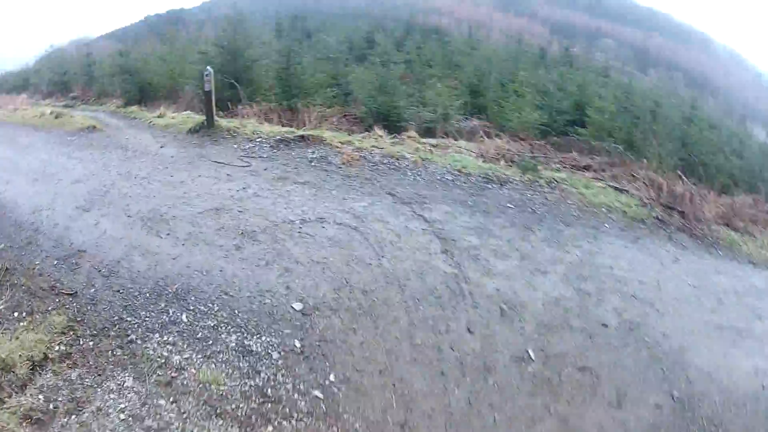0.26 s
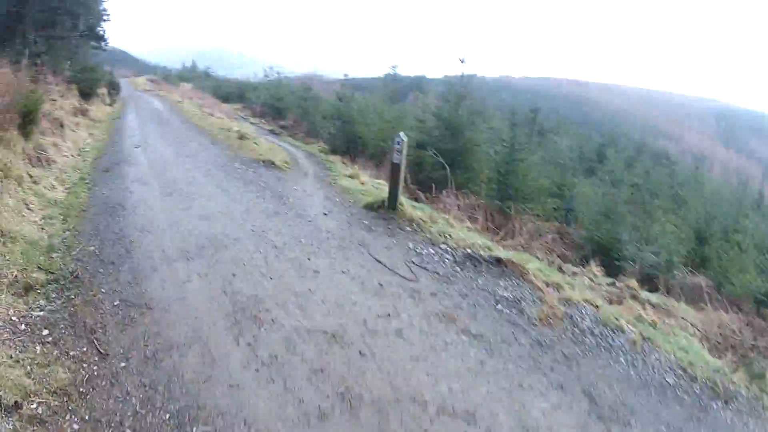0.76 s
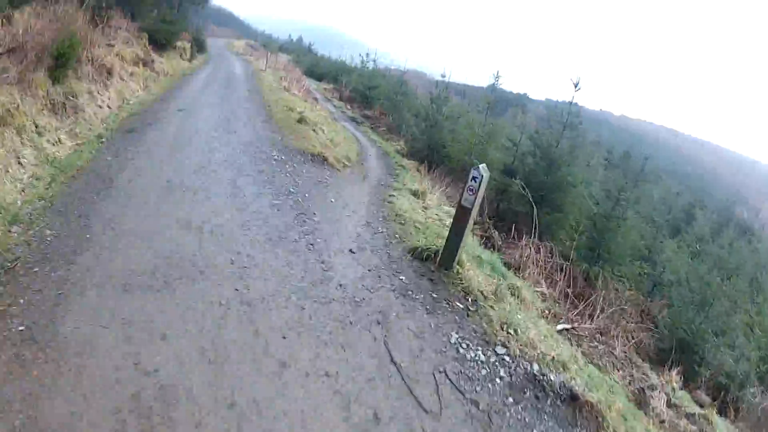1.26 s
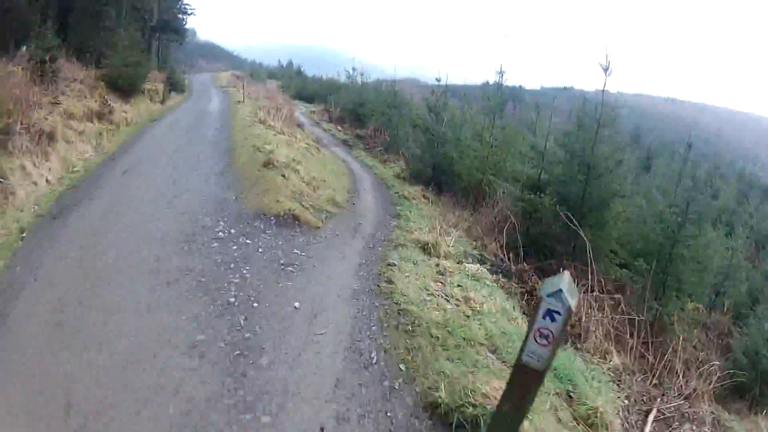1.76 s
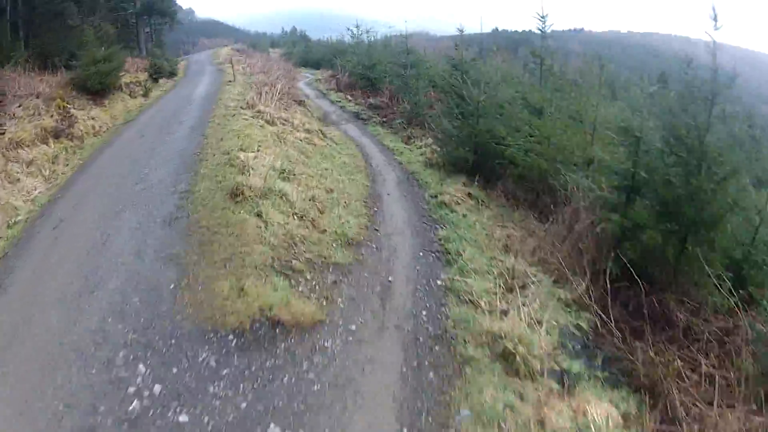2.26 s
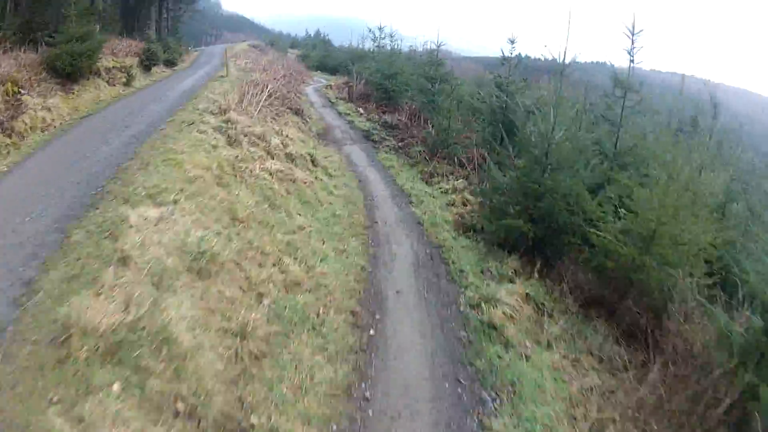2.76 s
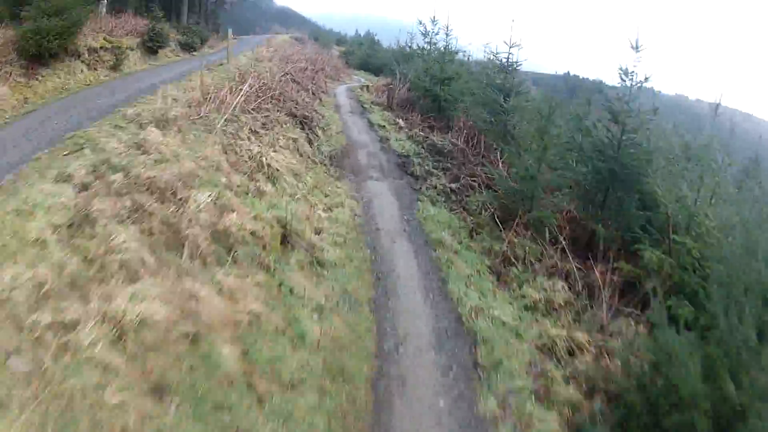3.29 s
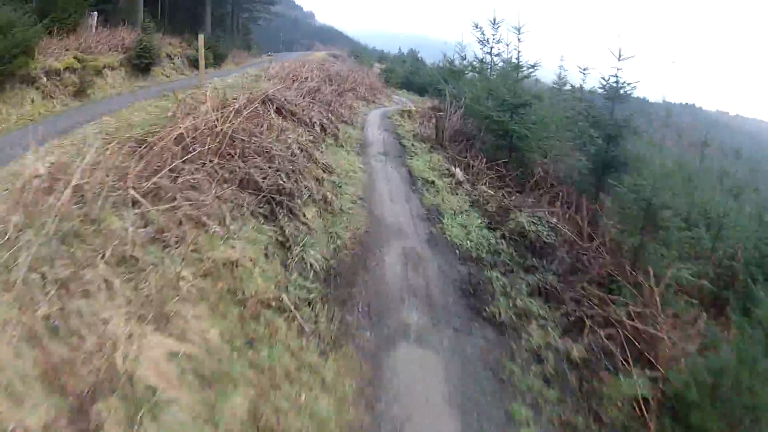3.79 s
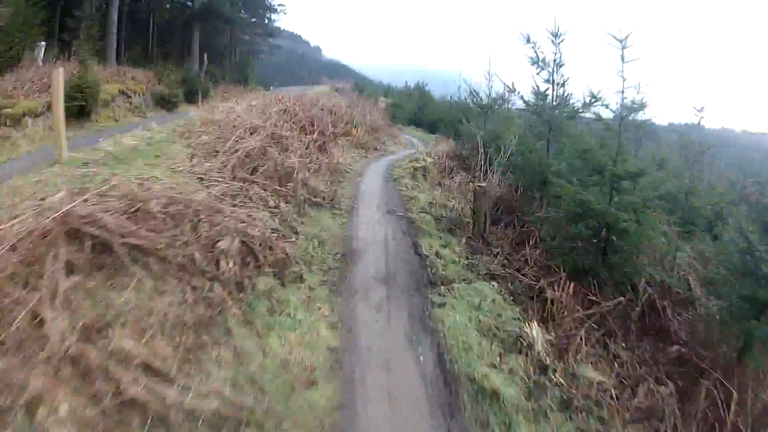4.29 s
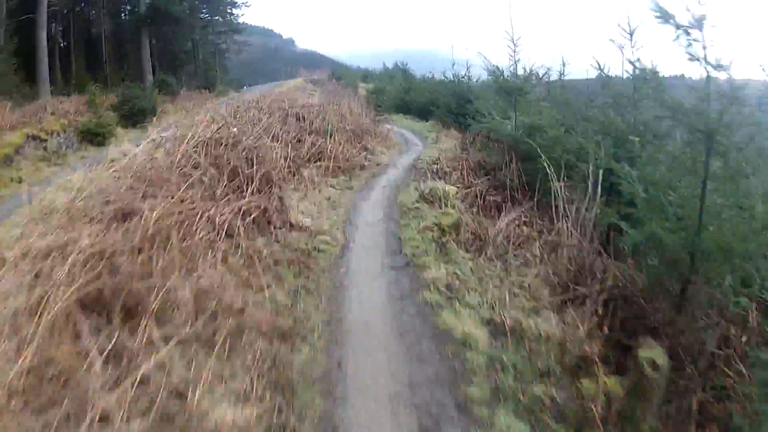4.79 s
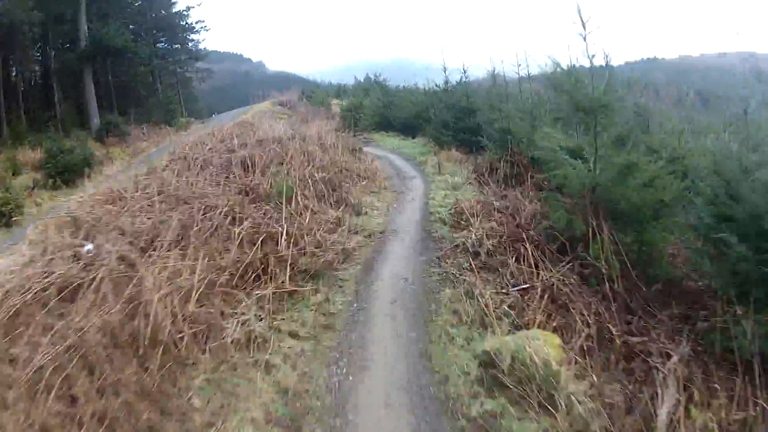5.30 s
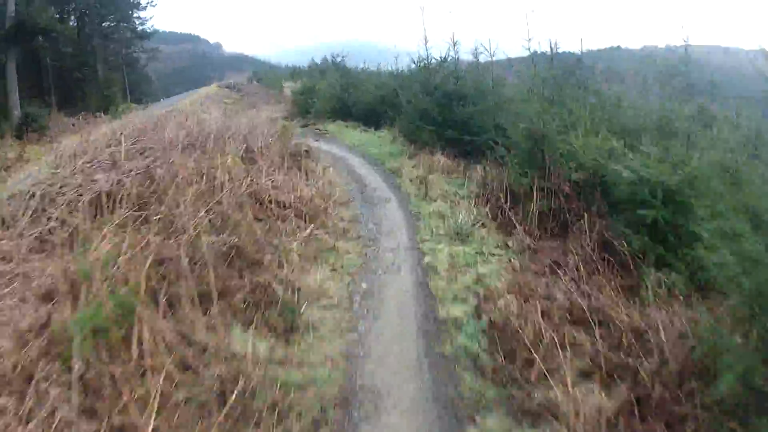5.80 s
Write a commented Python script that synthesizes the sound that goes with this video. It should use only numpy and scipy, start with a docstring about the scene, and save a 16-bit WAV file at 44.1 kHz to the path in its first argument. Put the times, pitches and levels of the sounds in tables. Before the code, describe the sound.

A mountain bike rides a gravel trail outdoors, heard from a microphone in a sealed helmet housing. Soft tyre crunch runs throughout, with a busy cluster of small knocks and dull thuds first, then light scrapes and chain ticks. A firmer thud comes at one and a half seconds. As speed builds, low wind swells into fluttering, booming gusts, pierced by one sharp hard clack at four seconds.

```python
"""Knocks and thuds sound over low wind and gravel crunch from the start; scrapes and ticks join in,
and the wind grows gusty later. A mountain bike gathers speed on a gravel trail; the microphone rides
on the helmet in a sealed housing. Wind is shaped noise with single pushes on the membrane; gravel is dense
random contacts through resonances. Knocks, scrapes and ticks are short noise contacts ringing modes; thuds are
decaying sines with a rumble. The camera samples at 12 kHz and holds each value, mirroring sound around 12 kHz."""
import sys
import numpy as np
from scipy import signal
from scipy.fft import rfft, irfft
from scipy.io import wavfile
from scipy.ndimage import uniform_filter1d

SR = 44100
rng = np.random.default_rng(int(sys.argv[2]) if len(sys.argv) > 2 else 0)


def file_out(sig):
    """Save sig as 16-bit WAV at sys.argv[1]."""
    # one column per channel
    cols = np.atleast_2d(sig).T
    # limit, then scale
    lim = np.clip(cols, -1, 1)
    pcm = np.round(lim * 32767).astype(np.int16)
    wavfile.write(sys.argv[1], SR, pcm)


N = 266802  # length in samples, about 6 s


def undb(db):
    """Amplitude gain of a level in dB."""
    return 10 ** (np.asarray(db) / 20)


def unit(x):
    """Scales a signal to rms 1."""
    return x / np.sqrt(np.mean(x ** 2))


def columns(table):
    """Interpolates every level column of a table over start_s, sample by sample."""
    start_s, *levels = np.transpose(table)
    return [np.interp(np.arange(N) / SR, start_s, level) for level in levels]


def walk(rate_hz):
    """Random levels held for 1 / rate and smoothed twice; standard deviation 1."""
    hold = int(SR / rate_hz)
    steps = np.repeat(rng.standard_normal(N // hold + 1), hold)
    smooth = uniform_filter1d(uniform_filter1d(steps, hold), hold)[:N]
    return smooth / smooth.std()


def resonate(x, peaks):
    """Parallel resonances as a sum of band-passes with alternating sign."""
    out = 0
    for k, (hz, width_hz, db) in enumerate(peaks):
        b, a = signal.iirpeak(hz, hz / width_hz, SR)
        out = out + (-1) ** k * undb(db) * signal.lfilter(b, a, x)
    return out


def ring(hz, t60):
    """A sine that decays by 60 dB in t60 seconds."""
    t = np.arange(int(abs(t60) * SR) + 2) / SR
    return np.sin(2 * np.pi * hz * t) * np.exp(-np.log(1000) * t / abs(t60))


def add(out, start_s, sound, peak_db):
    """Mixes a sound in at its start time with the given peak level."""
    i = int(start_s * SR)
    sound = sound[:N - i]
    out[i:i + len(sound)] += sound * undb(peak_db) / np.abs(sound).max()


def turbulence(spectrum, shared_db, own_db):
    """Half-octave bands of eddies; every band follows a shared throb and flickers on its own."""
    hz, db = np.transpose(spectrum)
    octave = np.log2(np.fft.rfftfreq(N, 1 / SR) + 1)
    colour = undb(np.interp(octave, np.log2(hz), db, left=-60, right=-90))
    out = 0
    for centre in np.arange(4, 11, .5):  # octaves above 1 Hz
        window = np.cos(np.pi * np.clip(octave - centre, -.5, .5))
        band = irfft(rfft(rng.standard_normal(N)) * colour * window, N)
        out = out + band * undb(shared_db + own_db * walk(13))
    return unit(out)


# single hard gusts that push the membrane: start_s, peak_db, length_s (of the first half-swing)
GUSTS = [(1.355, -20.5, 0.0085), (1.402, -29, 0.0083), (1.817, -15.5, 0.004), (1.931, -20, 0.0028),
         (2.058, -21.8, 0.0037), (2.185, -21, 0.004), (2.235, -19.5, 0.0079), (2.304, -11.5, 0.0038),
         (2.424, -13, 0.0036), (2.715, -10.5, 0.0036), (3.152, -12, 0.0024), (3.299, -11.5, 0.0033),
         (3.324, -13.1, 0.0059), (3.594, -5, 0.0044), (3.677, -10.5, 0.0072), (3.796, -7.5, 0.003),
         (3.91, -10, 0.0043), (4.07, -7.5, 0.0075), (4.16, -13, 0.0036), (4.245, -7, 0.0092),
         (4.311, -5, 0.0058), (4.652, -8.5, 0.0055), (4.671, -13, 0.0076), (4.856, -7.5, 0.0055),
         (4.974, -5.5, 0.0044), (5.046, -4.5, 0.0041), (5.164, -10, 0.004), (5.305, -10.5, 0.0047),
         (5.534, -9.5, 0.0076), (5.569, -14, 0.0045), (5.688, -21, 0.0026), (5.755, -19, 0.0088),
         (5.961, -7, 0.005)]
SWIRL_S = 0.0089  # half-width of the eddies around a gust
SWIRL_BUFFET_DB, SWIRL_FLUTTER_DB = -13.5, -19.5  # eddy levels against the gust's peak


def gust_swirl():
    """Power of the eddies stirred up around every gust, one bell curve each."""
    t = np.arange(N) / SR
    return sum(undb(2 * peak_db) * np.exp(-((t - start_s) / SWIRL_S) ** 2)
               for start_s, peak_db, _ in GUSTS)


def gusts():
    """Each gust swings the membrane one way and back, fading as it goes."""
    out = np.zeros(N)
    for start_s, peak_db, length_s in GUSTS:
        phase = np.arange(int(2 * length_s * SR)) / (length_s * SR)
        push = np.sin(np.pi * phase) * np.exp(-.7 * phase) * np.sin(np.pi * phase / 2)
        add(out, start_s, push, peak_db)
    return out


# wind on the housing: start_s, buffet_level_db, flutter_level_db
WIND = [(0.0, -43, -47), (0.98, -40, -42.5), (1.38, -32.5, -38), (1.67, -45, -39), (1.84, -22.5, -30.5),
        (2.09, -32, -38), (2.68, -23, -24), (3.12, -29, -23.5), (3.66, -12.5, -20), (3.82, -23, -23.5),
        (4.28, -16, -19), (4.63, -21.5, -22.5), (4.67, -16.5, -23), (4.77, -28, -26), (4.85, -14.5, -20.5),
        (5.14, -26, -24), (5.98, -25.5, -22), (6.05, -23, -24)]
# relative spectrum of the slow buffeting: pitch_hz, level_db (spectral density)
BUFFET = [(8.8, -45), (15, -6), (54, 4), (189, -8.5), (300, -14), (390, -49), (660, -120)]
# relative spectrum of the quicker flutter: pitch_hz, level_db (spectral density)
FLUTTER = [(50, -10.5), (110, -0.5), (160, -2.5), (300, -3.5), (450, -10.5), (620, -15.5), (750, -27),
           (950, -36.5), (1400, -36)]
SURGE_DB = 2.5  # depth of the buffeting's random surging
PUSH_BIAS = 0.099  # wind pushes the membrane further in than it pulls it out


def wind():
    """Slow buffeting and quicker flutter, lopsided as the membrane yields inward; gusts stir up both."""
    buffet_db, flutter_db = columns(WIND)
    throb = walk(21.9)
    buffet = turbulence(BUFFET, 1.1 * throb + SURGE_DB * walk(11), own_db=0.26)
    flutter = turbulence(FLUTTER, 0.95 * throb, own_db=1.43)
    both = (buffet + flutter) / 2
    lopsided = 1 + PUSH_BIAS * 3 * np.tanh(both / 3)
    swirl = gust_swirl()
    # steady wind and eddies add as powers
    buffet_gain = np.sqrt(undb(2 * buffet_db) + undb(2 * SWIRL_BUFFET_DB) * swirl)
    flutter_gain = np.sqrt(undb(2 * flutter_db) + undb(2 * SWIRL_FLUTTER_DB) * swirl)
    return lopsided * (buffet_gain * buffet + flutter_gain * flutter) + gusts()


def stones(rate_per_s, spread_db):
    """Dense random contacts of very uneven size and random sign."""
    chance = rng.random((3, N))
    size = undb(-spread_db * np.log(chance[1] + .004)) * np.sign(chance[2] - .5)
    return (chance[0] < rate_per_s / SR) * size


# tyres on gravel: start_s, crunch_level_db, grit_level_db (against the crunch)
GRAVEL = [(0.0, -51.5, -13), (0.2, -55.5, -9.5), (0.44, -54.5, -13.5), (0.81, -50, -13), (0.98, -51, -11),
          (1.26, -56, -9), (1.43, -56, -12), (1.68, -52.5, -10.5), (2.36, -51.5, -11), (2.53, -49.5, -15.5),
          (2.98, -45.5, -13.5), (3.33, -44, -14), (4.38, -45.5, -8), (4.62, -47, -13), (5.29, -47.5, -11),
          (6.05, -45, -13.5)]
# resonances of the housing: pitch_hz, width_hz, level_db (relative)
HOUSING = [(1224, 310, -4), (1820, 350, 0.5), (2070, 385, 0), (2643, 410, 0.5), (2976, 330, -0.5),
           (3750, 620, -10)]
# resonances heard in the fine grit: pitch_hz, width_hz, level_db (relative)
GRIT = [(4050, 740, -9), (4590, 550, 9), (5450, 600, -7), (5600, 830, -9)]
# tyre carcass ringing on the stones: pitch_hz, width_hz, level_db (relative)
TYRE = [(302.4, 22, 1), (472, 155, -4.5), (611, 180, -4)]
TYRE_DB = 8  # over the crunch


def gravel():
    """Stones crack under the tread and ring housing and tyre; crunch and grit come in patches."""
    crunch_db, grit_db = columns(GRAVEL)
    patch = undb(1.0 * walk(25.06) + 0.81 * walk(90))
    contact = unit(stones(3000., spread_db=2.5)) + 0.83 * rng.standard_normal(N)
    crunch = undb(crunch_db) * unit(patch * resonate(contact, HOUSING))

    # the same contacts, shifted by half the length, so that grit and crunch do not coincide
    fine = resonate(np.roll(contact, N // 2), [(4740, 3400, 0)])
    fine = patch * undb(1.2 * walk(40)) * resonate(fine, GRIT)
    grit = undb(crunch_db + grit_db) * unit(fine)

    thumps = resonate(unit(stones(400., spread_db=3.5)), [(397, 630, 0)])
    tyre = undb(crunch_db + TYRE_DB) * unit(resonate(thumps, TYRE))
    return crunch + grit + tyre


SCATTER_DB = 1.5  # random spread of each mode's level
RADIATE_HZ, WALL_HZ = 1190, 5440  # light parts radiate little below, the housing wall passes little above
WALL = signal.butter(4, [RADIATE_HZ, WALL_HZ], "band", fs=SR, output="sos")


def strike(modes, length_s, fade, hardness_db, ring_share=1, crack_db=-12):
    """A short rattling contact rings the modes, each time a little differently, under bare contact noise."""
    t = np.linspace(0, 1, max(int(abs(length_s) * SR), 8))
    envelope = np.exp(-fade * t) * np.sin(np.pi * t).clip(0) ** 0.36
    contact = rng.standard_normal(4096)[:len(t)] * envelope
    chance = rng.standard_normal((len(modes), 2))
    body = np.zeros(len(t) + SR // 10)
    for (hz, db, t60), (level_chance, pitch_chance) in zip(modes, chance):
        free = ring(hz * (1 + 0.0071 * pitch_chance), min(ring_share * t60, .09))
        driven = signal.convolve(contact, free)
        driven *= np.linalg.norm(free) / np.linalg.norm(driven)  # every mode takes its own share of the blow
        tilt_db = hardness_db * np.log2(hz / 2500)  # harder contacts favour the high modes
        body[:len(driven)] += undb(db + tilt_db + SCATTER_DB * level_chance) * driven
    body[:len(t)] += undb(crack_db) * contact * np.linalg.norm(body) / np.linalg.norm(contact)
    return signal.sosfilt(WALL, body)


STRAY_PER_S = 6
STRAY_DB, STRAY_SPREAD_DB = 7.5, 4.5  # base peak over the crunch level, random spread


def stray_knocks():
    """Small knocks at random times whose peaks follow the crunch level."""
    crunch_s, crunch_db = np.transpose(GRAVEL)[:2]
    strays = []
    for when, size, hardness in rng.random((int(STRAY_PER_S * N / SR), 3)):
        start_s = when * N / SR
        over_db = STRAY_DB - STRAY_SPREAD_DB * np.log(size + 0.063)
        peak_db = np.interp(start_s, crunch_s, crunch_db) + over_db
        strays.append((start_s, peak_db, 16 * hardness - 8))
    return strays


# stones and slaps on the frame: start_s, peak_db, hardness_db (per octave)
KNOCKS = [(0.089, -32.5, 5), (0.132, -29.5, 2), (0.169, -30.5, -3), (0.1963, -31.5, -14), (0.2225, -36, 1),
          (0.371, -33, 20), (0.4214, -37, 11), (0.465, -35, -4), (0.6205, -34.5, 0), (0.7373, -38, 5),
          (0.8157, -32, 7), (.865, -39, 10), (1.0056, -41, -2), (1.0206, -31.5, 7), (1.165, -34, 8),
          (1.174, -33.5, 2), (1.222, -38, -1), (1.4044, -41, 5), (1.513, -35, 1), (1.5474, -34, 11),
          (1.585, -33, 5), (1.6787, -35, 2), (2.0263, -41, -4), (2.239, -44, 9), (2.271, -42, 4),
          (2.6085, -32.5, 2), (2.758, -39, -13), (2.774, -37, -2), (2.794, -23, -14), (2.916, -29, 0),
          (3.299, -30, 4), (3.358, -28.5, 9), (3.896, -29, 0), (4.0022, -12.5, 16), (4.17, -26.5, 6),
          (4.235, -25.5, -13), (4.332, -31, -12), (5.436, -30.5, -8), (5.586, -31.5, 0), (5.763, -33, -2)]
# modes of the freely ringing frame: pitch_hz, level_db (relative), t60_s
FRAME_MODES = [(1260, -15, 0.018), (1850, -15, 0.026), (1883, -5, 0.052), (2071, -1, 0.034),
               (2390, -1, 0.012), (2860, 3, 0.022), (3020, 2, 0.018), (3230, -4, 0.016), (3960, -5, 0.02),
               (4560, -23, 0.016), (4950, -8.5, 0.0072)]
KNOCK_S = 0.0037  # contact length
KNOCK_RING = 0.89  # a stone damps the frame: share of the free ring time


def knocks():
    """Brief contacts of stones and slaps ring the frame's modes."""
    out = np.zeros(N)
    for start_s, peak_db, hardness_db in KNOCKS + stray_knocks():
        add(out, start_s, strike(FRAME_MODES, KNOCK_S, 2.2, hardness_db, KNOCK_RING), peak_db)
    return out


THUD_TAIL_DB, THUD_TAIL_RATIO = -15, 3.5  # padding rumble: starting level, length in ring times
THUD_RISE_S = 0.00043  # time constant of the soft onset


def thud(hz, t60):
    """A soft blow rings the helmet shell; its padding rumbles on."""
    body = ring(hz, t60)
    for ratio, share in ((1.7, 0.49), (2.7, 0.17), (4.1, 0.1)):
        overtone = ring(ratio * hz, t60 / ratio)
        body[:len(overtone)] += share * overtone
    t = np.arange(int(THUD_TAIL_RATIO * len(body))) / SR
    rumble = rng.standard_normal(SR // 2)[:len(t)]
    for _ in range(3):
        rumble = resonate(rumble, [(hz, 1.1 * hz, 0)])
    out = undb(THUD_TAIL_DB - 30 * t / t[-1]) * unit(rumble)
    out[:len(body)] += body[:len(out)]
    return out * (1 - np.exp(-t / THUD_RISE_S))


# dull thuds through the helmet: start_s, peak_db, pitch_hz, t60_s
THUDS = [(0.185, -27.5, 301, 0.037), (.198, -21.5, 477, 0.012), (.216, -37, 390, 0.025),
         (.223, -35, 435, 0.014), (.589, -29.5, 505, .02), (.659, -22.5, 333, 0.012),
         (0.744, -29, 296, 0.058), (1.177, -39, 510, 0.013), (1.513, -30, 644, 0.015),
         (1.516, -19, 522, 0.065), (5.043, -17, 292, 0.028)]


def thuds():
    """Soft blows on the helmet, each a low decaying ring with overtones and a rumble."""
    out = np.zeros(N)
    for start_s, peak_db, hz, t60 in THUDS:
        add(out, start_s, thud(hz, t60), peak_db)
    return out


# something rubs along the frame: start_s, peak_db, length_s, hardness_db (per octave),
# crack_db (bare contact noise against the ringing)
SCRAPES = [(0.637, -37, 0.028, 20, -8), (0.706, -39, .015, 10, -8), (0.957, -39.5, 0.089, 10, -8),
           (1.301, -44, 0.016, 5, -10), (1.52, -40.5, .08, -1, -8), (1.708, -24.5, 0.036, -20, -19),
           (2.064, -40, 0.059, -15, -14), (2.795, -28, 0.014, -6, -2), (4.004, -16.5, 0.0095, 8, 1),
           (4.01, -33, 0.032, 16, 11), (4.167, -33.5, .03, 0, -8), (4.238, -31, 0.013, -20, -14),
           (4.331, -32.5, .03, -6, -4), (5.299, -36, 0.044, -21, -12)]
SCRAPE_FADE, SCRAPE_RING = 0.79, 0.78  # decay over the contact; damped share of the free ring time


def scrapes():
    """Rubbing contacts excite the frame's modes and damp them too."""
    out = np.zeros(N)
    for start_s, peak_db, length_s, hardness_db, crack_db in SCRAPES:
        rub = strike(FRAME_MODES, length_s, SCRAPE_FADE, hardness_db, SCRAPE_RING, crack_db)
        add(out, start_s, rub, peak_db)
    return out


# chain and cable ticks: start_s, peak_db
TICKS = [(1.1017, -28), (1.1574, -37.5), (1.219, -38.5), (1.254, -36.5), (1.305, -40), (1.3243, -35),
         (1.601, -37), (1.6317, -36), (1.702, -26.5), (1.764, -42), (1.8616, -33.5), (2.869, -40.5),
         (2.9, -38), (3.01, -40), (3.042, -39), (3.633, -35), (3.7693, -36), (4.0034, -14), (4.1669, -36),
         (4.231, -28.5), (4.271, -30), (4.3258, -31), (4.457, -33), (4.918, -36), (5.304, -37),
         (5.542, -35.5), (5.668, -34), (5.707, -31.5), (5.951, -39.5)]
# ringing of chain and cables: pitch_hz, level_db (relative), t60_s
TICK_MODES = [(2800, -28.5, .01), (3870, -7, .008), (4510, 1, 0.02), (4740, 4, 0.012), (5220, -7.5, 0.017)]
TICK_S = 0.0051  # contact length


def ticks():
    """Small contacts ring the high modes of chain and cables."""
    out = np.zeros(N)
    for start_s, peak_db in TICKS:
        add(out, start_s, strike(TICK_MODES, TICK_S, fade=0.84, hardness_db=0, crack_db=-19), peak_db)
    return out


def scene():
    """Wind, trail and shaken bike all reach the one microphone in the helmet housing."""
    return (wind() + gravel() + knocks() + thuds() + scrapes() + ticks())[None]


CEILING = .95  # soft limit of the amplitude
HOLD_HZ, BASS_HZ, TOP_HZ = 12000, 19, 15250  # sampling rate, bass cut, top cut


def record(dry):
    """Bass cut, soft ceiling, sampling at 12 kHz with each value held four steps of a 48 kHz stream, top cut."""
    x = signal.sosfilt(signal.butter(2, BASS_HZ, "high", fs=SR, output="sos"), dry[0])
    x = x / (1 + (x / CEILING) ** 6) ** (1 / 6)
    coarse = signal.resample_poly(x, HOLD_HZ, SR)
    held = signal.resample_poly(np.repeat(coarse, 4), SR, 4 * HOLD_HZ)[:N]
    top_cut = signal.ellip(8, .2, 70, TOP_HZ, fs=SR, output="sos")
    return signal.sosfilt(top_cut, held)[None]


dry = scene()
out = record(dry)
file_out(out)
```